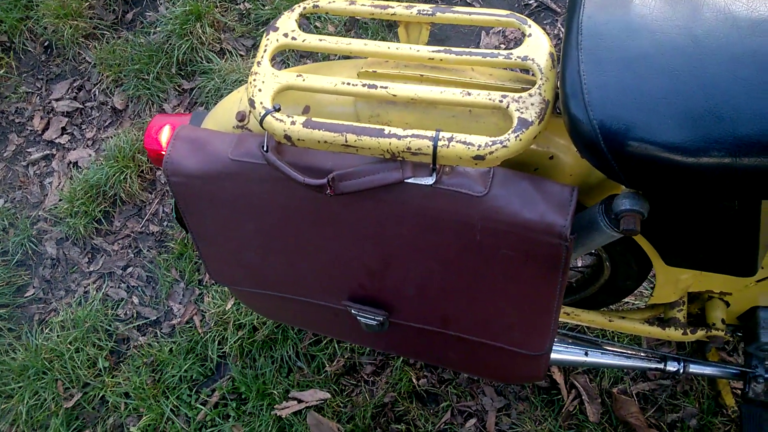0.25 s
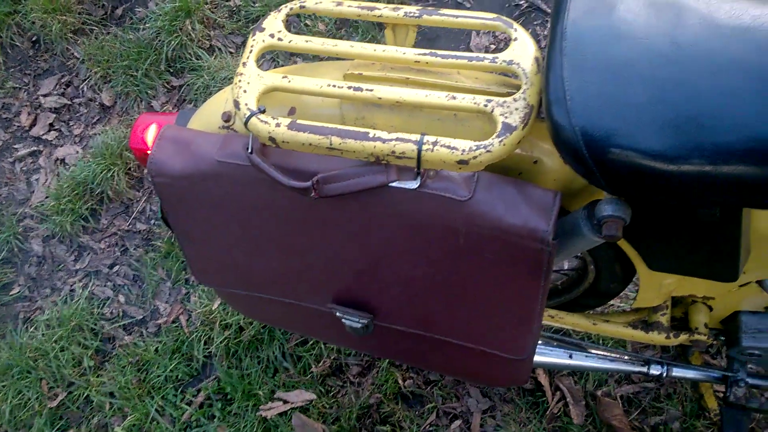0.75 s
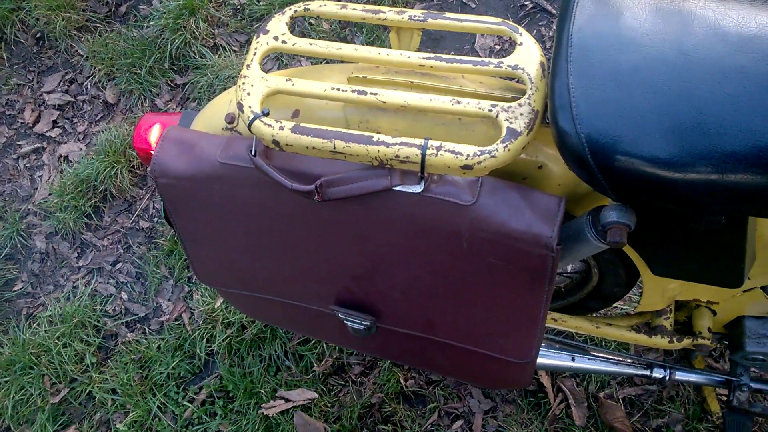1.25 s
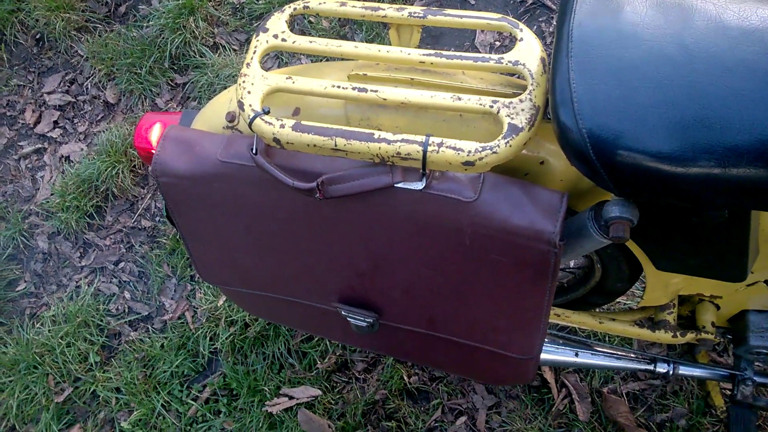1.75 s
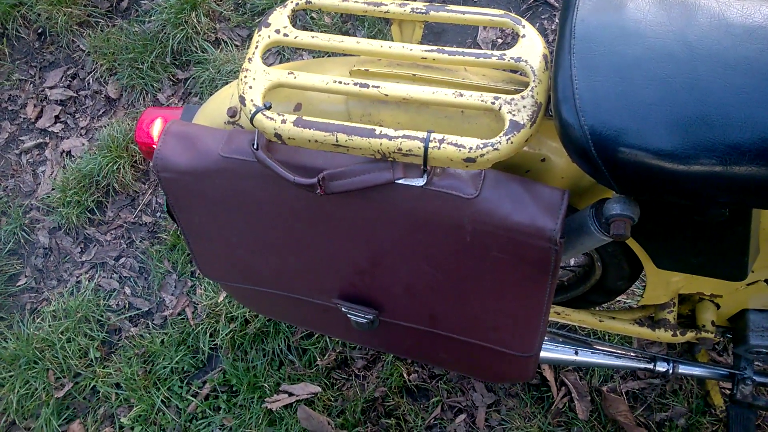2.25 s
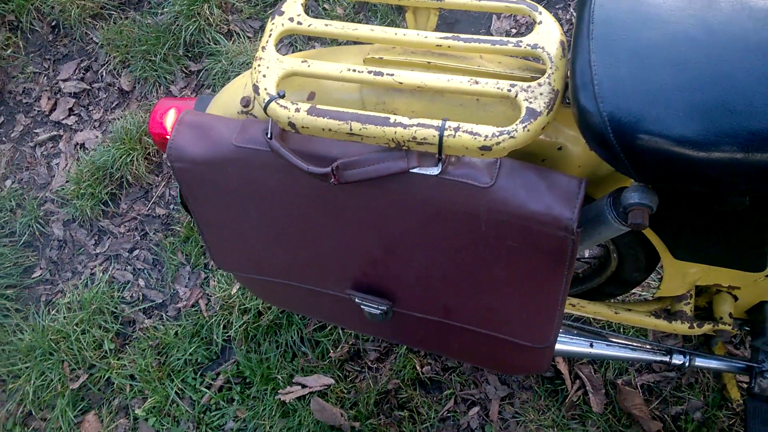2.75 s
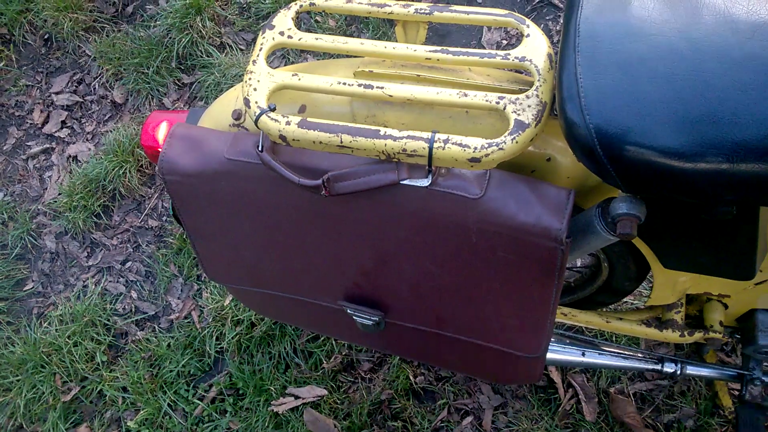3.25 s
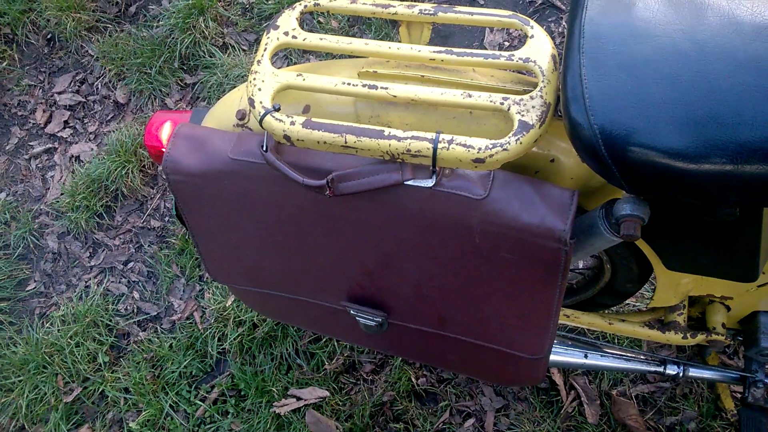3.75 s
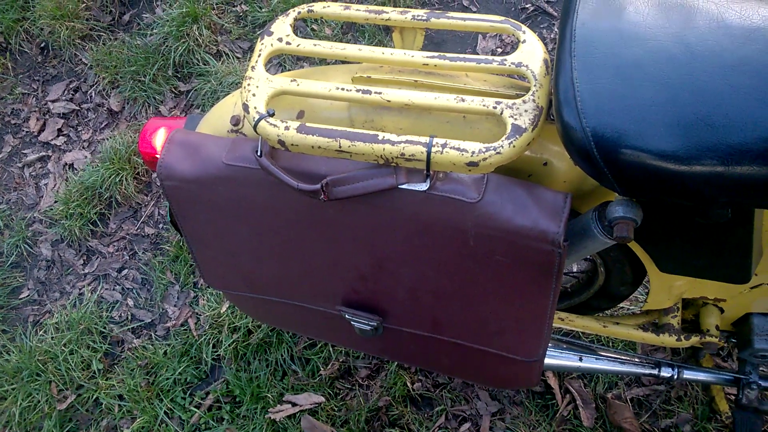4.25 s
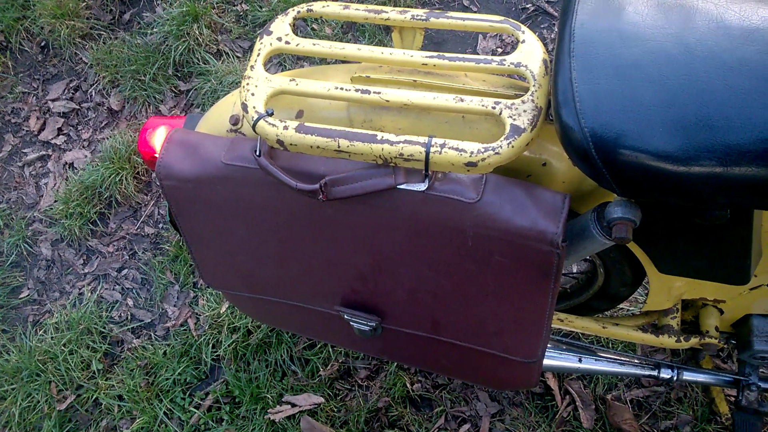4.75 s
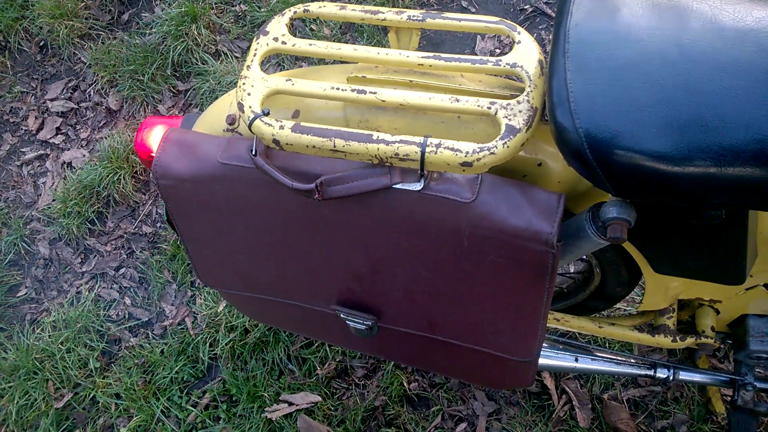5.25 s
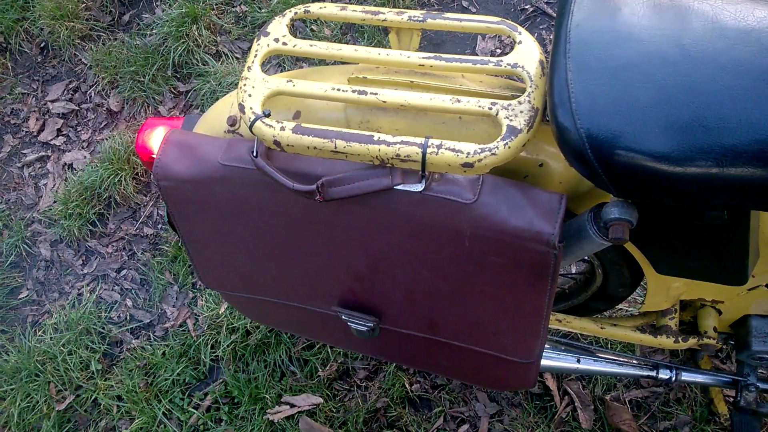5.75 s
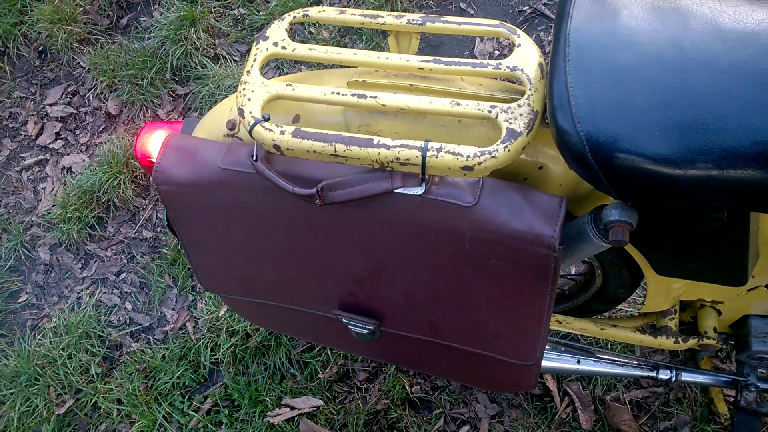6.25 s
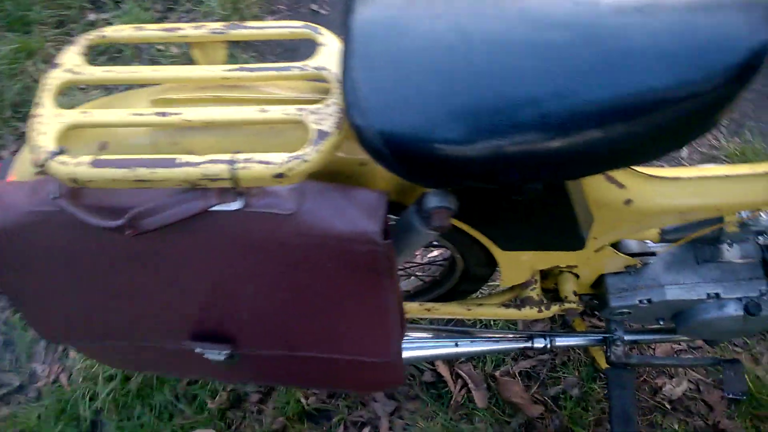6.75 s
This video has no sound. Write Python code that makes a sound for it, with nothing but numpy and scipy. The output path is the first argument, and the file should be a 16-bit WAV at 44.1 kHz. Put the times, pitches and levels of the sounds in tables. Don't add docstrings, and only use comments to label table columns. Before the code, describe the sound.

Close outdoors, a little two-stroke idles in soft, irregular bursts, then its throttle opens, pitch rises in two steps, and it falters while slowing.

```python
import sys
import numpy as np
from scipy import signal
from scipy.fft import rfft, irfft
from scipy.io import wavfile
from scipy.ndimage import uniform_filter1d

SR = 44100
rng = np.random.default_rng(int(sys.argv[2]) if len(sys.argv) > 2 else 0)


def rack_gain(trim_db):
    fader = np.asarray(trim_db, float)
    return 10 ** (fader / 20)


def to_wav(s):
    ch = np.atleast_2d(s).T
    pcm = np.round(np.clip(ch, -1, 1) * 32767)
    wavfile.write(sys.argv[1], SR, pcm.astype(np.int16))


N = 308682


def rms_one(x):
    return x / np.sqrt(np.mean(x ** 2) + 1e-20)


def filtered(x, order, f_hz, kind):
    return signal.sosfilt(signal.butter(order, f_hz, kind, fs=SR, output="sos"), x)


def in_time(rows):
    s, *columns = np.transpose(rows)
    return [np.interp(np.arange(N) / SR, s, c) for c in columns]


def bumps(s, height, half_s):
    t = np.arange(0, N, 64) / SR
    humps = np.exp(-np.abs((t[:, None] - s) / half_s) ** 4.2) @ height
    return np.interp(np.arange(N) / SR, t, humps)


def ring(clicks, f_hz, t60_s):
    r = rack_gain(-60 / (t60_s * SR))
    w = 2 * np.pi * f_hz / SR
    return signal.lfilter([0, np.sin(w)], [1, -2 * r * np.cos(w), r * r], clicks + 1e-18)


def resonate(x, modes):
    out = 0
    for k, (f_hz, width_hz, level_db) in enumerate(modes):
        r = np.exp(-np.pi * width_hz / SR)
        a = [1, -2 * r * np.cos(2 * np.pi * f_hz / SR), r * r]
        mode = signal.lfilter([(1 - r * r) / 2, 0, (r * r - 1) / 2], a, x)
        out = out + (-1) ** k * rack_gain(level_db) * mode
    return out


def coloured(spectrum):
    f_hz, level_db = np.transpose(spectrum)
    grid_hz = np.fft.rfftfreq(N, 1 / SR) + 1
    gain = rack_gain(np.interp(np.log(grid_hz), np.log(f_hz), level_db))
    return rms_one(irfft(rfft(rng.standard_normal(N)) * gain, N))


def per_turn(turns, curve, spread_db):
    whole = np.floor(turns - turns[0]).astype(int)
    first = np.searchsorted(whole, whole)
    chance = rack_gain(spread_db * rng.standard_normal(whole[-1] + 1))
    return curve[first] * chance[whole]


def puff(turns, sharp):
    gate = uniform_filter1d(np.exp(-sharp * (turns % 1)), size=40)
    return gate / gate.mean()


def law_db(law, opened, speed, near):
    idle_turns_per_s = 42.5
    return law[0] + law[1] * opened + law[2] * (speed - idle_turns_per_s) + law[3] * near


def stack(points, speed, turns, first, last):
    f_hz, level_db = np.transpose(points)
    out = 0
    for k in range(first, last + 1):
        gain = rack_gain(np.interp(np.log(k * speed), np.log(f_hz), level_db))
        out = out + gain * np.cos(2 * np.pi * k * turns)
    return out


def crank():
    # t/s, speed/(turns/s)
    speed_rows = [(0, 42.38), (1, 42.37), (1.35, 43.3), (1.8, 42.98), (2.05, 42.54), (3.2, 42.46),
                  (3.95, 43.56), (4.22, 47.84), (4.46, 51.38), (4.75, 55.74), (5.15, 59.15), (5.5, 60.02),
                  (5.73, 60.12), (6.02, 64.43), (6.44, 70.5), (6.54, 70.12), (6.68, 67.8), (7, 64.39)]
    speed, = in_time(speed_rows)
    return speed, -.44 + np.cumsum(speed) / SR


def firing():
    # t/s, strength [1]
    throttle = [(0, 0.034), (4.15, 0.13), (4.25, 1.14), (4.4, 1.17), (4.8, 1.27), (5.3, 1.2), (5.7, 1.4),
                (6.1, 1.42), (6.5, 1.55), (6.6, 1.3), (7, 1.0)]
    # t/s, strength [1], half length/s
    burst_runs = [(0.054, 1.7, 0.018), (0.22, 1, 0.038), (0.378, 1, 0.035), (0.562, 0.98, 0.033),
                  (0.718, 1.1, 0.03), (0.869, 1.2, 0.024), (1.04, 1.4, 0.023), (1.16, 1.1, 0.025),
                  (1.324, 1, 0.037), (1.513, 1.4, 0.023), (1.682, 1, 0.039), (1.855, 0.94, 0.028),
                  (2.025, 1.02, 0.043), (2.155, 0.92, 0.026), (2.309, 0.91, 0.051), (2.469, 0.9, 0.042),
                  (2.636, 0.95, 0.037), (2.783, 0.98, 0.031), (2.933, 0.92, 0.037), (3.073, 0.68, 0.05),
                  (3.277, 0.56, 0.12), (3.376, 0.26, 0.016), (3.504, 1.1, 0.023), (3.66, 0.91, 0.031),
                  (3.83, 1.1, 0.038), (4, 1.02, 0.033), (4.13, 1.3, 0.02)]
    # t/s, depth [0-1], half length/s, thump [1]
    stumbles = [(4.56, .4, .015, .3), (4.685, .4, .015, .3), (4.82, .5, .012, .3), (5.25, .4, .02, .3),
                (5.36, .4, .02, .3), (5.53, .4, .015, .3), (6.37, .3, .02, .3), (4.3, .01, .12, .45),
                (5.695, .75, .03, .8), (6.565, .75, .04, .9), (6.715, .9, .04, .9), (6.885, .6, .035, .9)]
    burn, = in_time(throttle)
    s, height, half_s = np.transpose(burst_runs)
    bursts = bumps(s + 0.0035, height, 1.21 * half_s)
    s, depth, half_s, kick = np.transpose(stumbles)
    steady = burn * np.clip(1 - bumps(s, depth, half_s), 0, 1)
    thump = bursts + bumps(s, kick, half_s)
    return np.clip(burn, 0, 1), bursts, steady, thump


def port_turns(turns, speed, bursts):
    port = turns + .21 + .007 * (speed - 43)
    return port - .08 * uniform_filter1d(bursts, size=3000)


def boom(turns, speed, opened, near, bursts, steady):
    # idle/dB, open throttle/dB, speed/(dB per turn/s), near/dB
    boom_law = (-27, 3, 0.45, -7.5)
    level_db = law_db(boom_law, opened, speed, near) + 2.1 * bursts
    level_db = level_db - 1.5 * (opened - np.minimum(steady, 1))
    return np.sqrt(2) * rack_gain(level_db) * np.cos(2 * np.pi * turns)


def crank_orders(turns, port, speed, opened, steady):
    # f/Hz, level/dB
    low_orders = [(90, -33.5), (115, -34), (145, -30), (175, -31), (203, -38), (258, -27), (310, -36.5),
                  (420, -34)]
    # f/Hz, level/dB
    singing = [(450, -53.5), (515, -35.5), (555, -36.5), (595, -37), (680, -60), (770, -40), (870, -57),
               (1000, -52)]
    low = -steady * stack(low_orders, speed, turns - .55, 2, 6)
    low = low * rack_gain(0.18 * (speed - 60.5))
    hum = (1 - opened) * rack_gain(-40) * np.cos(8 * np.pi * (turns - .05))
    return low + hum + steady * stack(singing, speed, port - .14, 8, 18)


def pipe(turns, strength, column, jitter_s, spread_db):
    # f/Hz, t60/s, pumping/dB, port crack/dB, thump/dB
    pipe_modes = [(92.4, 0.25, -3, -30.5, -5.5), (135, 0.088, -5, -32.5, 6.5),
                  (173.4, 0.15, -6, -28.5, -3.5), (210.3, 0.17, 4.5, -26, -20),
                  (287.5, 0.047, 11.5, -17.5, -20), (351, 0.064, 2.5, -14, -4),
                  (519.3, 0.084, -1.5, -1.5, -31), (614, 0.042, -25, -4.5, -22.5),
                  (678.3, 0.034, -13, 8, -23), (751.5, 0.083, -28, 0, -15), (954, 0.12, -24.5, -17.5, -10),
                  (1100, 0.016, -38, -31, -35), (1543, 0.1, -43, -14, -40.5),
                  (2230, 0.0035, -50.5, 3.5, -33)]
    at = np.flatnonzero(np.diff(np.floor(turns)))
    chance = rng.standard_normal((len(at), len(pipe_modes) + 2))
    moved = np.clip(at + (jitter_s * SR * chance[:, 0]).astype(int), 0, N - 1)
    out = np.zeros(N)
    for k, mode in enumerate(pipe_modes):
        varied_db = spread_db * (.3 * chance[:, 1] + .25 * chance[:, k + 2])
        clicks = np.zeros(N)
        clicks[moved] = strength[at] * rack_gain(mode[column] + varied_db)
        out += ring(clicks, mode[0], mode[1])
    return filtered(out, 4, 3000, "low")


def echoes(x, gains):
    lag = round(.0058 * SR)
    return x + sum(g * np.roll(x, lag * (k + 1)) for k, g in enumerate(gains))


def pumping_pulses(port, speed, opened, near, bursts):
    # idle/dB, open throttle/dB, speed/(dB per turn/s), near/dB
    pumping_law = (-26.5, -5, 0.0331, -5)
    dead = 1 - 0.59 * np.clip(bursts, 0, 1)
    pulses = pipe(port + .07, dead, column=2, jitter_s=.0001, spread_db=2.0)
    return rack_gain(law_db(pumping_law, opened, speed, near)) * rms_one(echoes(pulses, (.7, .5)))


def combustion_pulses(port, burn, thump):
    crack = pipe(port, burn, column=3, jitter_s=.00008, spread_db=1.5)
    thud = pipe(port - .27, thump, column=4, jitter_s=.0002, spread_db=1.2)
    return -rack_gain(-29.5) * crack - rack_gain(-23.5) * thud


def knocks(port, strength):
    spread_db, decay_s = 3, 0.0075
    at = np.flatnonzero(np.diff(np.floor(port)))
    chance = np.clip(rng.standard_normal((len(at), 2)), -2, 2)
    out = np.zeros(N)
    top_db = -74 + spread_db * chance[:, 1] / 2
    for band_hz, level_db in (([1500, 5500], -49), ([7000, 15000], top_db)):
        clicks = np.zeros(N)
        clicks[at] = strength[at] * rack_gain(level_db + spread_db * chance[:, 0])
        dying = signal.lfilter([1], [1, -np.exp(-1 / (decay_s * SR))], clicks + 1e-18)
        noise = filtered(rng.standard_normal(N), 5, band_hz, "band")
        out += uniform_filter1d(dying, size=30) * rms_one(noise)
    return out


def exhaust_rumble(bursts, steady):
    # f/Hz, density/(dB per Hz)
    eddies = [(29, -20), (70, -0.5), (173, -5.5), (258, -8), (343, -7.5), (451, -5.5), (513, -12.5),
              (584, -10.5), (1100, -12.5), (1430, -54), (2420, -120)]
    return rack_gain(-30.5 + steady + 2 * bursts) * coloured(eddies)


def gas_hiss(port, late, hiss_db):
    # f/Hz, density/(dB per Hz)
    jet = [(530, -15.5), (900, -3), (971, -4.5), (1170, -0.5), (1660, -13.5), (1850, -9.5), (2820, -14),
           (3070, -15.5), (3520, -19), (4060, -19), (4650, -29.5), (5510, -31), (6810, -51.5),
           (8850, -76.5), (15000, -120)]
    surge = .8 + .4 * per_turn(port, late, spread_db=1.1)
    return rack_gain(hiss_db - 3.5) * coloured(jet) * surge * (0.93 + 0.08 * puff(port, sharp=1.2))


def fin_clatter(port, late, hiss_db):
    # f/Hz, width/Hz, level/dB
    fin_modes = [(1180, 90, 0), (1880, 140, -6), (2080, 90, -6), (2530, 90, -12), (3010, 60, -12),
                 (3260, 70, -14), (3910, 50, -17), (4200, 90, -12), (5360, 70, -22), (5870, 60, -29)]
    strength = per_turn(port, .25 + .6 * late, spread_db=2.0)
    slap = rng.standard_normal(N) * (.5 + strength * puff(port, sharp=3.0))
    fins = rack_gain(hiss_db - 6.5) * rms_one(resonate(slap, fin_modes))
    return signal.sosfilt(signal.cheby2(6, 45, 7400, fs=SR, output="sos"), fins)


def contact_ticks(port, late):
    ticks = (rng.random(N) < .15) * rng.standard_normal(N)
    ticks = ticks * (.6 + .4 * puff(port + .1, sharp=2.5))
    return ticks * per_turn(port, 1 + .3 * late, spread_db=2.2)


def bracket_rattle(ticks, rattle_db):
    # f/Hz, width/Hz, level/dB
    bracket_modes = [(8200, 300, -6), (9500, 200, -4), (10000, 200, -3), (10950, 350, 0), (12150, 400, 0),
                     (14700, 300, -12)]
    # t/s, rise/dB, half length/s
    jolts = [(5.274, 2, 0.013), (5.716, 4.5, .012), (5.928, 8, .025), (6.567, 4.0, 0.022), (6.758, 5, .04),
             (6.89, 5.5, .02), (6.965, 3.5, 0.014)]
    air = 0.79 * filtered(np.roll(ticks, 999), 2, [6000, 13000], "band")
    level_db = rattle_db + 4.5 + bumps(*np.transpose(jolts))
    return rack_gain(level_db) * rms_one(resonate(ticks, bracket_modes) + air)


def cylinder_rasp(ticks, rattle_db, near):
    rasp = filtered(ticks, 3, [1900, 5500], "band")
    body = resonate(rasp, [(2120, 400, 0.0), (2900, 360, -2.0)])
    return rack_gain(rattle_db + 23.5 + 0.5 * near) * rms_one(rasp + 1.5 * body)


def scene():
    # t/s, nearness [0-1]
    nearness = [(0, 0.23), (5.6, 0), (6.28, 0.2), (6.6, 0.57), (7, 0.8)]
    # idle/dB, open throttle/dB, speed/(dB per turn/s), near/dB
    hiss_law = (-36.0, 3.5, 0.1462, 5)
    rattle_law = (-87.5, 2, 0.4584, 6.5)
    near, = in_time(nearness)
    speed, turns = crank()
    opened, bursts, steady, thump = firing()
    late = np.roll(bursts, int(0.0062 * SR))
    port = port_turns(turns, speed, bursts)
    hiss_db = law_db(hiss_law, opened, speed, near)
    rattle_db = law_db(rattle_law, opened, speed, near)

    mix = boom(turns, speed, opened, near, bursts, steady)
    mix = mix + crank_orders(turns, port, speed, opened, steady)
    mix += pumping_pulses(port, speed, opened, near, bursts)
    mix += combustion_pulses(port, steady + late, thump)
    mix += knocks(port + 0.063, late + .4 * steady * rack_gain(13 * near))
    mix += exhaust_rumble(bursts, steady)
    mix += gas_hiss(port, late, hiss_db)
    mix += fin_clatter(port, late, hiss_db)
    ticks = contact_ticks(port, late)
    mix += bracket_rattle(ticks, rattle_db)
    mix += cylinder_rasp(ticks, rattle_db, near)
    return mix[None]


def top_cut(x):
    return signal.sosfilt(signal.butter(12, 15720, fs=SR, output="sos"), x)


def record(dry):
    noise = rack_gain(-80) * rng.standard_normal(dry.shape)
    mix = filtered(dry + noise, 2, 22, "high")
    return top_cut(mix)


dry = scene()
out = record(dry)
to_wav(out)
```